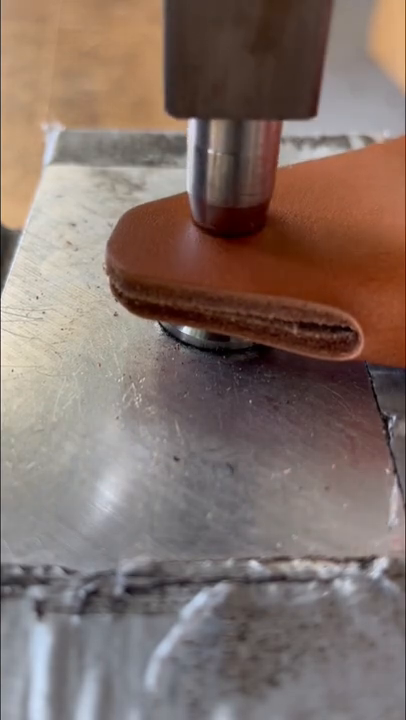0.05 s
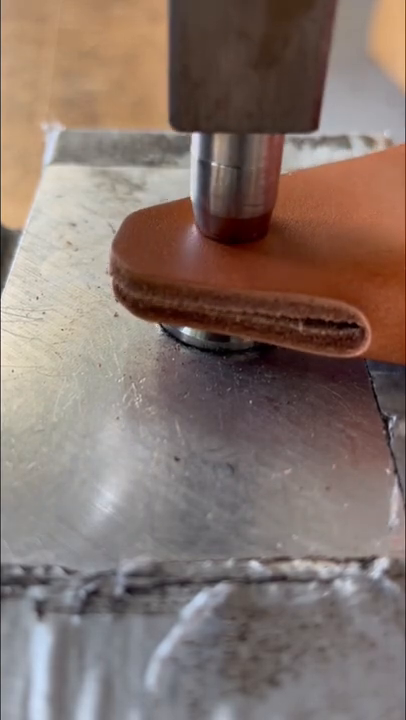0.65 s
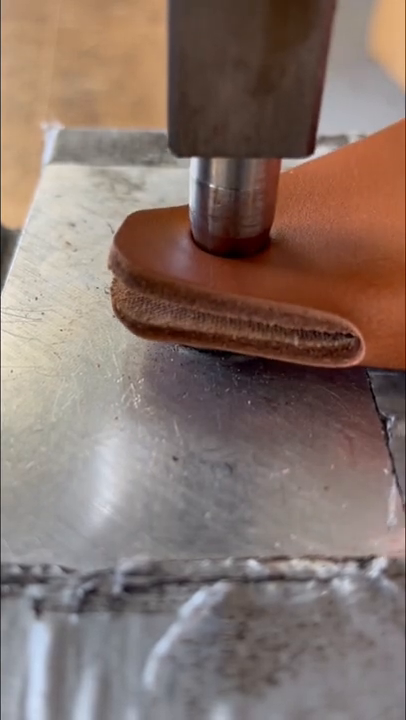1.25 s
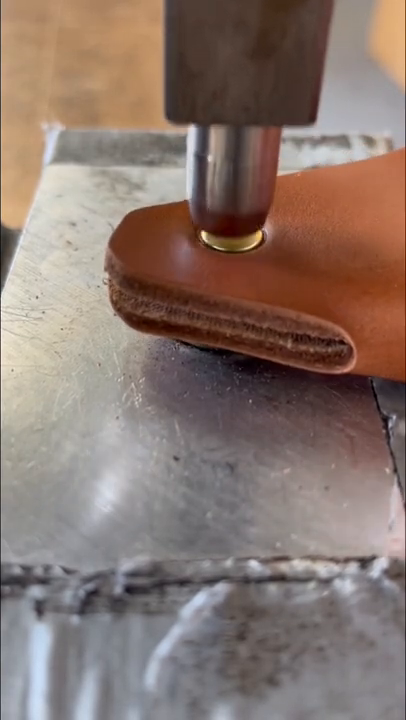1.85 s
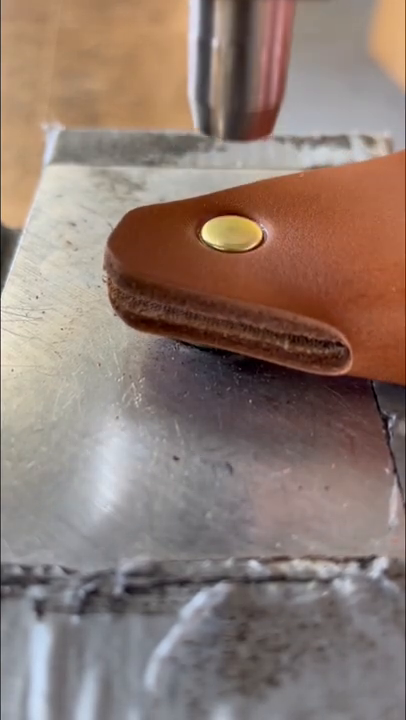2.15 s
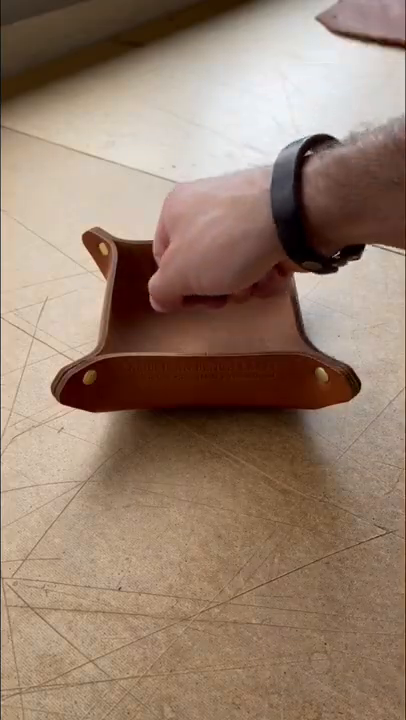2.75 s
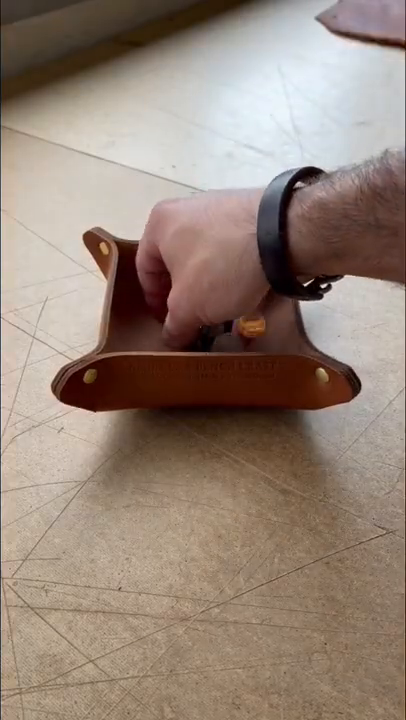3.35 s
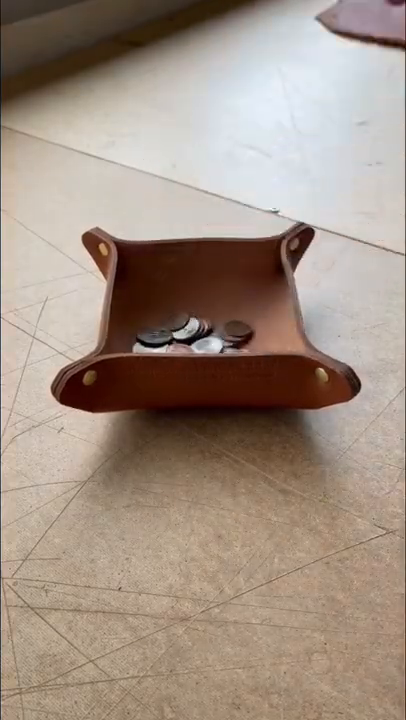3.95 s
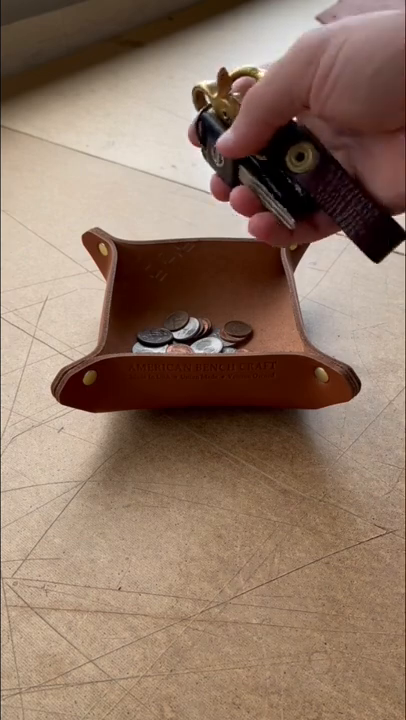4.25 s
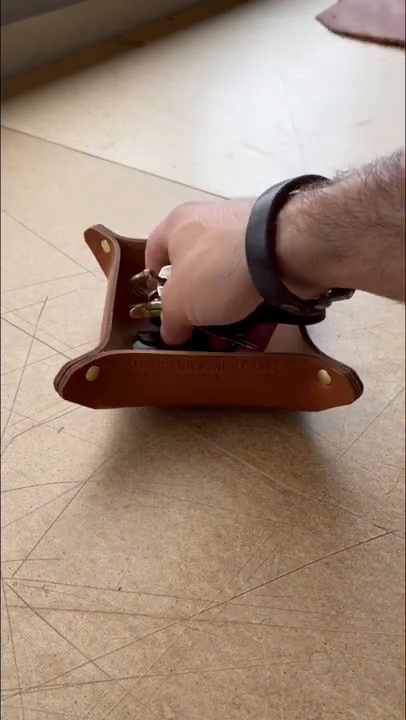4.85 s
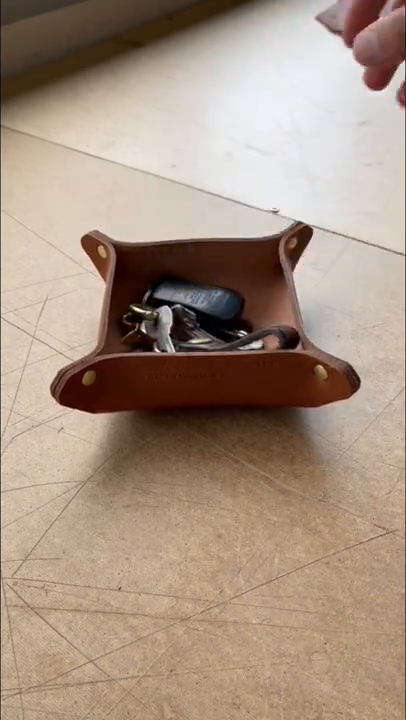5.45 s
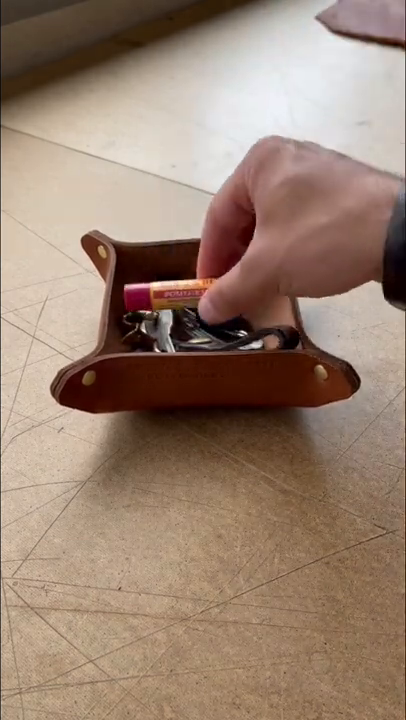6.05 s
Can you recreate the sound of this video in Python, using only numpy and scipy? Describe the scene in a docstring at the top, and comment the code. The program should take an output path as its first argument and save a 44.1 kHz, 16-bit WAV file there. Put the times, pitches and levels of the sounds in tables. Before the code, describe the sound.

Small metal clicks and a ringing clunk from a rivet press, followed by coins clinking and keys jangling into a leather tray.

```python
"""Over a mains hum, a hand press squeezes a rivet into leather: small contacts tick, the leather
rubs and creaks in stick-slip, and near 2 s the lever clunks back and rings the iron frame.
From 2.4 s, in a quieter room, coins shift in a fist and slide, clashing and ringing, into a
leather tray that slaps on its table. Near 5 s a bunch of keys jangles in after them.
A phone close by hears it all through two microphone ports."""
import sys
import numpy as np
from scipy import signal
from scipy.fft import rfft, irfft, next_fast_len
from scipy.io import wavfile
from scipy.ndimage import uniform_filter1d

SR = 44100
rng = np.random.default_rng(int(sys.argv[2]) if len(sys.argv) > 2 else 0)


def output_pcm(signal):
    """Save a mono or channel-first signal as 16-bit PCM at the path in sys.argv[1].

    Samples are clipped to [-1, 1] before scaling.
    """
    pcm = np.clip(np.atleast_2d(signal).T, -1, 1) * 32767
    wavfile.write(sys.argv[1], SR, np.round(pcm).astype(np.int16))


N = 274302
TIME = np.arange(N) / SR
ROOM_CHANGE_S = 2.39

# Levels in the tables are relative: each layer applies its own gain to them.
# Mains hum and faint whine in the workshop; faint whine in the quieter room.
# Each row: frequency in Hz, level in dB.
MAINS_HUM = [(59.2, -43.5), (118.4, -54), (177.6, -58), (360.7, -63), (683.7, -72.5)]
SHOP_WHINE = [(1319, -78.5), (1437, -79), (2579, -83.5), (2697, -95), (2821, -87), (3058, -84.5),
              (3898, -89), (4140, -87), (4258, -89), (4619, -88)]
ROOM_WHINE = [(1082, -81.5), (1443, -86), (2099, -88), (2342, -93), (2702, -92), (2939, -92), (3182, -91.5),
              (3300, -95.5)]
# Ventilation spectra of the two rooms. Each row: frequency in Hz, spectral level in dB.
SHOP_AIR = [(20, -19), (45, 1), (90, 4), (150, 1), (230, -9.5), (400, -17), (800, -22), (1400, -34.5),
            (1800, -33.5), (2800, -40.5), (5000, -43.5), (9000, -56.5), (14000, -51.5), (16000, -69)]
ROOM_AIR = [(20, -30.5), (55, -4.5), (120, -3.5), (175, 2.5), (260, -14.5), (400, -22.5), (700, -30),
            (1050, -31.5), (1600, -38.5), (2800, -45), (5000, -51.5), (8000, -61.5), (15000, -75)]

# Ticks of rivet, die and loose metal in the hand.
# Each row: start in seconds, level in dB, resonance in Hz, share of the snap in dB.
TICKS = [(.012, -40, 8100, -0.5), (.115, -50, 5140, -4.5), (.302, -42, 3620, -4.5), (.325, -44.5, 3800, -5),
         (.452, -55, 3000, -6), (.768, -44, 2900, -1), (.885, -46, 2230, -4.5), (.928, -42, 3280, -6.5),
         (.963, -35.5, 4100, -7.5), (0.987, -49, 2700, -3), (1.04, -51, 12000, 0), (1.059, -42, 12000, -2),
         (1.067, -41, 6900, 0), (1.073, -29.5, 2870, -2.5), (1.083, -39, 2980, -9), (1.092, -41, 2700, -13),
         (1.12, -47, 2800, -7), (1.159, -46, 2900, 4), (1.191, -42, 2280, -2), (1.197, -44.5, 2600, 1),
         (1.291, -42.5, 2010, -5.5), (1.32, -44, 12000, 0), (1.325, -37, 2500, -2.5),
         (1.415, -52, 2300, -2), (1.562, -50, 8400, 0.5), (1.789, -36, 2200, -10), (1.82, -31, 2760, 0.5),
         (1.855, -41.5, 4500, -2), (1.941, -37, 12500, 3.5), (1.947, -34, 3570, -8), (2.053, -37, 7500, -5),
         (2.061, -25, 2060, -14), (2.064, -26.5, 4730, -7), (2.087, -19, 4170, -12.5),
         (2.09, -32, 2050, -16), (2.187, -51, 4200, -15), (2.577, -48, 7940, 3),
         (2.607, -32.5, 12100, -4.5), (2.786, -51, 9500, -4), (2.89, -47.5, 11320, -2.5),
         (4.087, -46, 12140, -8.5), (4.118, -50.5, 8510, 0), (4.564, -55, 7510, 7.5),
         (4.603, -51.5, 8950, 0), (4.714, -57, 7940, 4)]
# Stretches of faint ticking. Each row: start and end in seconds, level in dB, resonance in Hz.
TICKING_SPANS = [(1.03, 1.123, -53, 2800), (2.8, 2.839, -53, 7500), (2.945, 2.974, -55, 8520),
                 (4.11, 4.16, -53, 7960)]
# Knocks of lever and ram; the hollow ring sinks as the ram lifts.
# Each row: start in seconds, levels of body, clank and ring in dB, ring frequency in Hz.
LEVER_KNOCKS = [(0.048, -44, -45.5, -62, 497), (1.072, -42.5, -42, -61, 500), (1.704, -37, -50, -39, 480),
                (1.787, -29, -23.5, -36, 507), (1.798, -25, -30.5, -21, 516), (1.822, -25.5, -29, -20, 495),
                (1.838, -37, -44, -25, 487), (1.945, -29.5, -23, -28, 504), (1.956, -33, -42, -25, 522),
                (2.053, -20, -20, -25, 447), (2.061, -20, -19, -23, 425), (2.071, -32, -33, -22, 467),
                (2.087, -20, -18, -12.5, 469.4), (2.094, -27.5, -37, -12, 472.5),
                (2.187, -35.5, -38, -25.5, 460)]
# Rubbing of leather, lever and die.
# Each row: start and length in seconds, level in dB, resonance and bandwidth in Hz.
RUBS = [(0.061, 0.081, -51.5, 565, 450), (0.105, 0.062, -46.5, 486, 111), (0.298, 0.13, -61.5, 4530, 2400),
        (0.686, 0.062, -57, 1090, 1100), (1.061, 0.057, -55.5, 1210, 1610), (1.282, 0.048, -63, 1300, 1500),
        (1.917, 0.033, -36, 610, 444), (2.028, 0.046, -30.5, 603, 450), (2.041, 0.028, -49, 11000, 7000),
        (2.09, 0.021, -47, 11000, 7000)]
# Soft bumps of bench and table. Each row: start in seconds, level in dB, frequency in Hz.
BUMPS = [(0.158, -27, 88.6), (0.193, -29, 88), (2.04, -33, 214), (2.115, -27, 70.4), (3.26, -32, 79),
         (3.455, -32, 73), (3.6, -31.5, 64), (5.075, -27.5, 62), (5.152, -30.5, 55), (5.268, -31, 49)]
# Creaks of the leather. Each row: start in seconds, level in dB, low share in dB, T60 in seconds.
CREAKS = [(0.321, -62.5, -15, 0.81), (0.691, -55.5, 9.5, 0.5), (1.063, -58, 8, 0.21),
          (1.29, -62.5, 4, 0.37)]
# Chimes of the steel die. Each row: start in seconds, level in dB.
DIE_CHIMES = [(1.158, -58), (1.942, -54), (2.054, -47), (2.095, -39)]

# Coins shift in the fist, then slide out in batches; keys dangle, touch the coins and drop.
# Each row: start and length in seconds, level of the rattle in dB, level on the tray in dB.
COIN_SLIDES = [(2.952, 0.051, -51.5, -81.5), (3.066, 0.082, -44, -72.5), (3.222, 0.038, -35, -32),
               (3.256, 0.036, -36, -29), (3.338, 0.013, -39.5, -51), (3.355, 0.022, -33, -34.5),
               (3.412, 0.16, -29, -30.5), (3.575, 0.089, -31.5, -34.5)]
KEY_SLIDES = [(4.835, 0.037, -58, -50), (4.905, 0.0093, -34, -40.5), (4.954, 0.076, -43, -43),
              (5.014, 0.11, -29.5, -47.5), (5.087, 0.064, -30, -37), (5.241, 0.021, -45.5, -40.5)]
RATTLE_COLUMN, TRAY_COLUMN = 2, 3
# The loudest coin clicks. Each row: start in seconds, level in dB.
COIN_CLICKS = [(2.953, -36.5), (2.974, -27.5), (3.047, -25.5), (3.076, -39), (3.104, -40), (3.218, -26),
               (3.26, -17.5), (3.306, -29.5), (3.358, -18.5), (3.406, -24), (3.416, -12.5), (3.432, -18.5),
               (3.477, -26), (3.524, -13.5), (3.542, -16.5), (3.586, -22), (3.839, -33.5)]
# Coins ringing freely. Each row: start in seconds, frequency in Hz, level in dB, seconds until damped.
COIN_RINGS = [(2.952, 12680, -47, 0.09), (3.025, 12240, -43, 0.076), (3.048, 15600, -43.5, .04),
              (3.076, 12400, -39.5, .07), (3.076, 12740, -38, 0.04), (3.357, 13160, -30.5, .012),
              (3.358, 15800, -28, .012), (3.413, 8330, -28.5, .008), (3.415, 11300, -31.5, .007),
              (3.426, 13040, -28.5, 0.012), (3.464, 12285, -33, 0.013), (3.467, 11905, -34.5, .012),
              (3.48, 13200, -27, .016), (3.482, 12400, -29.5, 0.037), (3.52, 7200, -32.5, 0.0068),
              (3.538, 12975, -26.5, .012), (3.539, 12680, -27.5, 0.009), (3.541, 9140, -29.5, .012),
              (3.58, 15300, -23, .05), (3.605, 12790, -29, 0.013), (3.63, 12800, -28, .015),
              (3.639, 13145, -32, .014), (3.651, 9100, -32, 0.019), (3.61, 9300, -33, .02),
              (3.652, 15400, -31, .025), (3.67, 9160, -43, 0.29), (3.685, 12690, -29, 0.073)]
# Blows on the tray's bottom.
# Each row: start in seconds, levels of thud, slap and hollow tock in dB, tock frequency in Hz.
TRAY_BLOWS = [(3.14, -21, -22, -15, 1310), (3.193, -29.5, -26.5, -22.5, 1300),
              (3.219, -36.5, -20.5, -15, 1270), (3.2203, -24.5, -11, -7, 1270),
              (3.2208, -37.5, -21, -7, 3900), (3.222, -32.5, -10.5, -3, 4760),
              (3.26, -19, -12.5, -18.5, 1150), (3.344, -47, -40, -43, 1080), (3.37, -38, -29.5, -21.5, 950),
              (3.407, -39.5, -28, -27, 1150), (3.416, -30.5, -23.5, -27, 1400),
              (3.431, -26.5, -30.5, -30, 1540), (3.452, -37, -36, -29, 960), (3.471, -43, -35, -24.5, 970),
              (3.488, -46, -29.5, -18.5, 1140), (3.515, -33, -31, -19, 1170),
              (3.525, -20.5, -28.5, -21, 4500), (3.544, -29.5, -29, -28, 750),
              (3.586, -33.5, -40, -26, 1140), (3.624, -38.5, -34, -30, 1100), (3.64, -44, -37.5, -29, 807),
              (3.674, -38, -39, -41.5, 1110), (3.721, -50, -57.5, -43, 850),
              (4.916, -42.5, -48, -27.5, 1020), (5.043, -38, -42.5, -29, 1090),
              (5.051, -30, -33, -31.5, 600), (5.092, -40, -34, -33.5, 980), (5.1194, -33.5, -18, -21, 1070),
              (5.255, -52, -37, -36, 850), (5.294, -52, -48, -36, 1010)]
# The loudest key clicks, each ringing one key.
# Each row: start in seconds, levels of click and ring in dB, ring frequency in Hz.
KEY_CLICKS = [(4.841, -43.5, -44.5, 7700), (4.868, -40, -51.5, 5050), (4.916, -23.5, -30, 8800),
              (4.924, -26.5, -42.5, 4350), (4.968, -31.5, -34, 7900), (4.984, -28, -45, 5060),
              (5.013, -30.5, -39, 4200), (5.023, -26, -34.5, 3180), (5.036, -26, -32, 8000),
              (5.044, -18, -28.5, 6940), (5.07, -30, -39.5, 2080), (5.082, -25, -28, 11280),
              (5.092, -17.5, -31, 3320), (5.098, -18.5, -28, 5170), (5.1195, -16, -27, 4470),
              (5.129, -19.5, -39, 2370), (5.138, -25, -21, 2920), (5.155, -19.5, -38, 2035),
              (5.169, -31, -39, 3560), (5.177, -33, -40, 1920), (5.184, -29.5, -44, 5070),
              (5.197, -29, -47, 7700), (5.256, -26.5, -50, 4460), (5.265, -29, -30, 8170),
              (5.276, -39, -40, 6930), (5.294, -31.5, -43, 4000)]

# Normal modes of the press frame, die, heaped coins, tray, table top and keys.
# Each row: frequency in Hz, level in dB, T60 (the time to decay by 60 dB) in seconds.
FRAME_MODES = [(84, -12.5, 0.51), (212.3, -3, 0.23), (279, -4, 0.12), (417, -4, 0.14), (586, -0.5, 0.13),
               (753, -5, 0.061), (926, -12, 0.075), (1016, -9.5, 0.12), (1182, -10, 0.078),
               (1435, -12, 0.077), (1990, -19, 0.05)]
DIE_MODES = [(3850, -8, .06), (4690, 0, .1), (6780, -2, .055), (8790, -5, .045), (11300, -4, .03),
             (12600, -8, .04), (12940, -7, .04), (15250, -2, .04)]
COIN_MODES = [(7050, -13, .03), (8090, -10, .04), (8480, -9, .04), (9120, -7, .06), (9300, -8, .06),
              (9480, -10, .05), (11450, -9, .04), (11850, -7, .04), (12290, -2, .07), (12520, -6, .04),
              (12760, -3, .06), (12950, -5, .04), (13100, -2, .06), (13400, -8, .04), (14000, -6, .07),
              (15100, 2, .05), (15250, 1, .04), (15420, 4, .05)]
TRAY_MODES = [(62, -11, 0.3), (134, -6, 0.096), (185, -8.5, 0.11), (334, 4, 0.069), (396, -0.5, 0.031),
              (585, -7.5, 0.1), (785, -14.5, 0.034), (1138, -13.5, 0.018)]
TABLE_MODES = [(2014, -6.5, 0.008), (3050, -11.5, 0.008), (3570, -8, 0.0036)]
KEY_MODES = [(2030, -15, .05), (2950, -17, .05), (4500, -13, .035), (5030, -10, .035), (7000, -7, .03),
             (7640, -10, .04), (8510, -9, .04), (9000, -5, .03), (11280, -7, .03), (12500, -3, .03),
             (13050, -2, .03), (13500, -5, .03), (14950, 5, .018), (15200, 7, .018), (15450, 8, .018)]
# Spectra of the contact noises. Each row: frequency in Hz, spectral level in dB.
TICK_SPECTRUM = [(300, -12), (1000, 1.5), (2500, 7.5), (5000, 2.5), (8500, -0.5), (13000, -5.5),
                 (15400, -1.5), (16400, 7.5)]
CLANK_SPECTRUM = [(200, -15), (600, 5), (880, 11), (1200, -3), (1700, -3), (2100, -2), (2800, -18),
                  (4400, -20.5), (7000, -28), (16000, -40)]
PRESS_BODY_SPECTRUM = [(40, -20), (100, -4), (300, -5.5), (480, -8.5), (900, -17), (1500, -20), (2200, -37),
                       (3200, -47), (5000, -39), (8000, -65), (16000, -49)]
COIN_SPECTRUM = [(300, -21), (1000, -9.5), (2700, -14), (4800, -2.5), (8000, 4), (13000, 4.5), (15500, 9),
                 (16000, -23)]
SLAP_SPECTRUM = [(150, -17.5), (600, -3.5), (1250, 3.5), (1600, -5.5), (2100, -3), (2800, -7.5),
                 (4500, -3.5), (8000, -1), (11000, -9), (15300, -4), (16200, -14.5)]
PATTER_SPECTRUM = [(25, -12), (60, 3), (180, 6), (350, 0), (520, -4.5), (800, -11), (1200, -13.5),
                   (2000, -20.5), (4000, -14.5), (10000, -34.5)]
KEY_SPECTRUM = [(300, -3), (1000, 7.5), (1500, -4), (2100, -2.5), (2700, 0), (4000, -0.5), (5200, 3),
                (8000, 5), (13000, 0), (15400, 3.5), (16100, -20)]

# Response of the two microphone ports.
# Each row: frequency in Hz, phase lead of the left in radians, left minus right level in dB.
PORT_RESPONSE = [(0, 0, 0), (500, -.7, 2.5), (1000, -.7, .5), (1700, -.2, 0), (2300, 1, 0), (2750, 2.4, -1),
                 (3600, .9, -1), (5100, 1.3, 0), (6000, 3.14, 0), (7900, 6.2, 0), (8700, 6.9, 0),
                 (10200, 9.42, 0), (12200, 12.4, 0), (13300, 13.1, 0), (14600, 15.7, 0), (16500, 16.5, 0)]
# Brief dips of the level. Each entry: centre in seconds.
LEVEL_DIPS = [2.39, 4.027, 5.691]


def undb(db):
    """Amplitude ratio of a level in decibels."""
    return 10 ** (np.asarray(db) / 20)


def unit(x):
    """Normalisation to an rms of 1."""
    return x / np.sqrt(np.mean(x ** 2))


def add(track, s, sound):
    """Superposition of a sound on a track at s seconds."""
    start = int(s * SR)
    track[start:start + len(sound)] += sound[:N - start]


def colour(x, points):
    """Minimum-phase filtering, with unit energy, through (Hz, dB) points."""
    hz, db = np.transpose(points)
    grid = np.maximum(np.fft.rfftfreq(4096, 1 / SR), 1)
    cepstrum = irfft(np.log(undb(np.interp(np.log(grid), np.log(hz), db))))
    half = len(cepstrum) // 2
    cepstrum[1:half] *= 2  # folding the cepstrum makes the filter causal
    cepstrum[half + 1:] = 0
    response = irfft(np.exp(rfft(cepstrum)))[:half]
    return signal.oaconvolve(x, response / np.linalg.norm(response))[:N]


def fade(t60):
    """Exponential decay through 60 dB."""
    return np.exp(-np.log(1000) * np.arange(int(t60 * SR) + 2) / (t60 * SR))


def swell(t60, rise_s):
    """Exponential decay with a finite rise time."""
    shape = fade(t60)
    return shape * (1 - np.exp(-TIME[1:len(shape) + 1] / rise_s))


def bursts(rows, rise_s=.0002):
    """Contact noise: each row (s, dB, T60) is a dying flurry of tiny collisions."""
    out = np.zeros(N)
    for s, db, t60 in rows:
        shape = swell(min(t60, 1), rise_s)
        add(out, s, undb(db) * shape * rng.standard_normal(SR + 2)[:len(shape)])
    return out


def pings(rows, rise_s=.0001):
    """Damped oscillation: each row (s, dB, Hz, T60) is one struck resonance."""
    out = np.zeros(N)
    for s, db, hz, t60 in rows:
        shape = swell(t60, rise_s)
        add(out, s, undb(db) * shape * np.sin(2 * np.pi * hz * TIME[:len(shape)]))
    return out


def strikes(rows, modes, scatter_db, detune):
    """Modal superposition: blows (s, dB) ring the modes a little differently at each contact point."""
    out = np.zeros(N)
    chance = rng.standard_normal((len(rows), len(modes), 2))
    for (s, db), draws in zip(rows, chance):
        for k, ((hz, mode_db, t60), (strength, shift)) in enumerate(zip(modes, draws)):
            shape = fade(t60)
            wave = np.sin(2 * np.pi * hz * (1 + detune * shift) * TIME[:len(shape)])
            add(out, s, (-1) ** k * undb(db + mode_db + scatter_db * strength) * shape * wave)
    return out


def grains(per_s, spread_db):
    """A Poisson process of tiny, uneven impacts, with steady power near 1."""
    hit = rng.random(N) < per_s / SR
    impacts = hit * rng.choice([-1, 1], N) * undb(spread_db * rng.exponential(size=N))
    return impacts / np.sqrt(np.abs(uniform_filter1d(impacts ** 2, size=1100)) + 1e-6)


def tones(lines):
    """A line spectrum: steady sines of random phase from (Hz, dB rms) rows."""
    return sum(np.sqrt(2) * undb(db) * np.sin(2 * np.pi * (hz * TIME + rng.random()))
               for hz, db in lines)


def ventilation(spectrum, db, apart_hz=1300):
    """Diffuse rumble is coherent at the two ports in the bass and incoherent in the treble."""
    mid, side = (unit(colour(rng.standard_normal(N), spectrum)) for _ in range(2))
    side = signal.lfilter(*signal.butter(1, apart_hz, "high", fs=SR), side)
    return undb(db) * (mid + side * np.array([[1], [-1]]))


def background():
    """Stationary tones and noise: the humming workshop, then the quieter room."""
    shop = tones(MAINS_HUM) + undb(1) * tones(SHOP_WHINE) + ventilation(SHOP_AIR, db=-46)
    quiet = undb(5) * tones(ROOM_WHINE) + ventilation(ROOM_AIR, db=-46.5)
    return np.where(TIME < ROOM_CHANGE_S, shop, quiet)


def faint_ticks(per_s=22, scatter_db=2):
    """Random scatter of time, level and pitch gives rows like TICKS over each span of ticking."""
    rows = []
    for start, end, db, hz in TICKING_SPANS:
        count = max(round((end - start) * per_s), 1)
        for k, (when, size, pitch) in enumerate(rng.random((count, 3))):
            s = start + (end - start) * (k + when) / count
            rows.append((s, db + scatter_db * (2 * size - 1), hz * 2 ** (pitch - .5), 0))
    return rows


def heavy_slips(below_hz=5000):
    """Heavier parts ring lower: the ticks (s, dB) at the press that can move die and leather."""
    return [(s, db) for s, db, hz, _ in TICKS if s < ROOM_CHANGE_S and hz < below_hz]


def ticks(t60=.0098, die_db=-7, die_hz=780, die_t60=.025):
    """Brief contacts excite a snap and a broad resonance; smaller parts radiate less bass."""
    rings, snaps = np.zeros(N), np.zeros(N)
    shape = fade(t60)
    for s, db, hz, snap_db in list(TICKS) + faint_ticks():
        noise = unit(shape * rng.standard_normal(SR)[:len(shape)])
        contact = np.pad(noise * undb(db) * np.sqrt(np.mean(shape ** 2)), (0, len(shape)))
        snap = signal.lfilter(*signal.butter(2, hz / 3, "high", fs=SR), contact)
        ring = signal.lfilter(*signal.iirpeak(hz, Q=5, fs=SR), contact)
        add(snaps, s, undb(snap_db) * snap)
        add(rings, s, ring * np.linalg.norm(contact) / np.linalg.norm(ring))
    die = pings([(s, db + die_db, die_hz, die_t60) for s, db in heavy_slips()])
    return undb(-8) * rings + colour(snaps, TICK_SPECTRUM) + die


def frame_modes(softer_db, dull_above_hz=620):
    """A softer impact excites the frame's upper modes less, so it rings duller."""
    db_per_octave = .5 * softer_db
    return [(hz, db - db_per_octave * max(np.log2(hz / dull_above_hz), 0), t60)
            for hz, db, t60 in FRAME_MODES]


def lever(full_force_db=-18.5, rebound_s=.009, crack_t60=.042, clank_t60=.024, body_t60=.065,
          hollow_t60=.078):
    """Impact and rebound: the lever knocks twice in its play, and the iron frame rings hollow."""
    knocks = [row[:3] for row in LEVER_KNOCKS]
    knocks += [(s + rebound_s, db - 10, clank_db - 7) for s, db, clank_db in knocks]
    # only hard knocks crack: the crack loses 4 dB for each dB below full force
    cracks = bursts([(s, -46 + 4 * (db - full_force_db), crack_t60) for s, db, _ in knocks])
    clanks = bursts([(s, db, clank_t60) for s, _, db in knocks], rise_s=.00051)
    body = bursts([(s, db - 4, body_t60) for s, db, _ in knocks], rise_s=.0011)
    frame = sum(strikes([(s, db - 6)], frame_modes(full_force_db - db), scatter_db=1.5, detune=.008)
                for s, db, _ in knocks)
    hollow = pings([(s, db, hz, hollow_t60) for s, _, _, db, hz in LEVER_KNOCKS], rise_s=.0015)
    return (colour(cracks, TICK_SPECTRUM) + colour(clanks, CLANK_SPECTRUM)
            + colour(body, PRESS_BODY_SPECTRUM) + frame + hollow)


def rubs():
    """Stick-slip friction drives one resonance in each rub, swelling and fading."""
    out = np.zeros(N)
    slips = grains(per_s=900, spread_db=2)
    for s, length, db, hz, width in RUBS:
        arch = np.sqrt(np.hanning(int(length * SR)))
        band_hz = [max(hz - width / 2, hz / 2), hz + width / 2]
        resonance = signal.butter(2, band_hz, "band", fs=SR, output="sos")
        rub = signal.sosfilt(resonance, slips[int(s * SR):][:len(arch)])
        add(out, s, undb(db) * arch * unit(rub))
    return out


def bumps(t60=.16):
    """A hand's weight excites a low resonance of the work surface."""
    return pings([(s, db, hz, t60) for s, db, hz in BUMPS])


def crackle(t60=.059, band_hz=(1300, 4500)):
    """Stress relaxation: after each heavy slip the leather's fibres give way in a fine crackle."""
    give = np.zeros(N)
    for s, db in heavy_slips():
        add(give, s, undb(db - 13) * fade(t60))
    fibres = give * grains(per_s=600, spread_db=2.5)
    return signal.sosfilt(signal.butter(2, band_hz, "band", fs=SR, output="sos"), fibres)


def creaks():
    """Friction in the leather under the die makes a bright creak over a low groan."""
    creak = bursts([(s, db, t60) for s, db, _, t60 in CREAKS])
    groan = bursts([(s, db + low_db, t60) for s, db, low_db, t60 in CREAKS])
    groan = colour(groan, [(200, 4.5), (700, 3.5), (1300, 2.5), (2200, -28), (6000, -36)])
    return colour(creak, TICK_SPECTRUM) + groan


def die_chimes():
    """Free vibration of the steel die as it shifts and springs clear of the rivet."""
    return strikes(DIE_CHIMES, DIE_MODES, scatter_db=2, detune=.003)


def sliding(slides, column, attack_s=.011, sag_db_per_s=10, stop_t60=.17, settle_db=-25, settle_t60=.66):
    """Incoherent slides add in power; each starts, sags and stops, and a few pieces go on settling."""
    power = np.zeros(N)
    for row in slides:
        age, length = TIME - row[0], row[1]
        hold = np.clip(age / attack_s, 0, 1) * undb(row[column] - sag_db_per_s * np.clip(age, 0, length))
        fall = np.log(1000) * np.maximum(age - length, 0)
        release = np.maximum(np.exp(-fall / stop_t60), undb(settle_db) * np.exp(-fall / settle_t60))
        power += (hold * release) ** 2
    return np.sqrt(power)


def jingle(contacts, modes, turn_s=.015):
    """Forced resonance: contacts drive the modes of metal pieces, which take turns as they tumble."""
    out = np.zeros(N)
    turns = np.arange(0, N / SR + .1, turn_s)
    for hz, db, t60 in modes:
        radius = np.exp(-np.log(1000) / (t60 * SR))
        angle = 2 * np.pi * hz / SR
        poles = [1, -2 * radius * np.cos(angle), radius ** 2]
        gain = np.sin(angle) * np.sqrt(2 * (1 - radius ** 2))
        share = unit(np.interp(TIME, turns, rng.random(len(turns)) ** 2))
        out += undb(db) * signal.lfilter([gain], poles, contacts * share * rng.standard_normal(N))
    return out / np.linalg.norm(undb(np.array(modes)[:, 1]))


def clacks(slides, column, per_s, low_hz, high_hz, t60):
    """Separate collisions of sliding pieces, each a damped oscillation with its own pitch."""
    out = np.zeros(N)
    shape = fade(t60)
    start, end = round(slides[0][0], 1) - .1, round(slides[-1][0], 1) + .3
    for k, (when, pitch, size) in enumerate(rng.random((int((end - start) * per_s), 3))):
        hz = low_hz * (high_hz / low_hz) ** pitch
        ring = shape * np.sin(2 * np.pi * hz * TIME[:len(shape)])
        add(out, start + (k + when) / per_s, size ** 2 * ring)
    return unit(out) * np.sqrt((end - start) * SR / N) * sliding(slides, column)


def coins(click_t60=.012):
    """Dense collisions excite the coins' modes, which contact with the heap soon damps."""
    rattle = grains(per_s=650, spread_db=1.8) * sliding(COIN_SLIDES, RATTLE_COLUMN)
    contacts = rattle + bursts([(s, db, click_t60) for s, db in COIN_CLICKS])
    clash = colour(contacts, COIN_SPECTRUM)
    ring = jingle(contacts, COIN_MODES)
    knocks = clacks(COIN_SLIDES, RATTLE_COLUMN, per_s=260, low_hz=7000, high_hz=14000, t60=.045)
    return undb(-2.5) * clash + undb(-2) * ring + undb(-7) * knocks


def free_coins(t60=.43, damping_s=.0059, jostle_s=.008, jostle_db=3):
    """Mode splitting: a coin is never quite round, so it rings as a beating pair until damped."""
    out = np.zeros(N)
    shape = swell(t60, rise_s=.0023)
    t = TIME[:len(shape)]
    turns = np.arange(0, 1, jostle_s)
    for s, hz, db, free_s in COIN_RINGS:
        damping = np.exp(-np.maximum(t - free_s, 0) / damping_s)
        beat_hz = rng.uniform(25, 80)
        pair = np.sin(2 * np.pi * hz * t) + .4 * np.sin(2 * np.pi * (hz + beat_hz) * t)
        # the coin tilts as it is jostled, so its ring wavers
        waver = undb(np.interp(t, turns, jostle_db * rng.standard_normal(len(turns))))
        add(out, s, undb(db) * shape * damping * pair * waver)
    return out


def slaps(t60=.0036, soft_hz=2820, hard_hz=19000, scuff_db=-20, scuff_t60=.09):
    """A harder impact has a wider spectrum: the leather gives, slaps on the table, then scuffs."""
    out = np.zeros(N)
    shape, tail = swell(t60, rise_s=.00042), fade(scuff_t60)
    for s, _, db, _, _ in TRAY_BLOWS:
        cutoff_hz = soft_hz + (hard_hz - soft_hz) * undb(db)
        grit = signal.lfilter(*signal.butter(4, cutoff_hz, fs=SR), rng.standard_normal(SR))
        slap = shape * grit[:len(shape)]
        add(out, s, undb(db) * slap * np.linalg.norm(fade(t60)) / np.linalg.norm(slap))
        add(out, s, undb(db + scuff_db) * tail * unit(grit)[-len(tail):])
    return undb(2) * colour(out, SLAP_SPECTRUM)


def tray(tock_cycles=14):
    """Blows excite the modes of tray and table, and sliding metal patters on the leather."""
    tocks = pings([(s, db, hz, tock_cycles / hz) for s, _, _, db, hz in TRAY_BLOWS])
    thuds = strikes([(s, db - 2) for s, db, *_ in TRAY_BLOWS], TRAY_MODES, scatter_db=1.5, detune=.03)
    flow = sliding(COIN_SLIDES, TRAY_COLUMN) + sliding(KEY_SLIDES, TRAY_COLUMN)
    patter = colour(grains(per_s=350, spread_db=2.3) * flow, PATTER_SPECTRUM)
    taps = sum(clacks(slides, TRAY_COLUMN, per_s=170, low_hz=750, high_hz=1800, t60=.012)
               for slides in (COIN_SLIDES, KEY_SLIDES))
    # the hard table top snaps through the leather under each slap
    snaps = strikes([(s, db) for s, _, db, _, _ in TRAY_BLOWS], TABLE_MODES, scatter_db=1.5, detune=.03)
    return snaps + tocks + thuds + undb(-3) * patter + undb(-12) * taps


def keys(click_t60=.014, clink_t60=.02):
    """Keys scrape and collide with the coins, exciting heavily damped modes of many pitches."""
    rattle = grains(per_s=1100, spread_db=1.5) * sliding(KEY_SLIDES, RATTLE_COLUMN)
    contacts = rattle + bursts([(s, db, click_t60) for s, db, _, _ in KEY_CLICKS])
    clinks = pings([(s, db, hz, clink_t60) for s, _, db, hz in KEY_CLICKS])
    jangle = clacks(KEY_SLIDES, RATTLE_COLUMN, per_s=800, low_hz=6500, high_hz=15600, t60=.025)
    blades = clacks(KEY_SLIDES, RATTLE_COLUMN, per_s=220, low_hz=1700, high_hz=5400, t60=.022)
    clash = colour(contacts, KEY_SPECTRUM)
    ring = jingle(contacts, KEY_MODES)
    return undb(-6) * (clash + jangle) + undb(-2.5) * ring + clinks + undb(-17) * blades


def ports(x):
    """Diffraction round the phone makes phase and level between its ports vary with frequency."""
    size = next_fast_len(N + SR // 2)
    freq = np.fft.rfftfreq(size, 1 / SR)
    hz, lead, pan_db = np.transpose(PORT_RESPONSE)
    left = np.exp(.5j * np.interp(freq, hz, lead)) * undb(np.interp(freq, hz, pan_db) / 2)
    spectrum = rfft(x, size)
    return np.array([irfft(spectrum * side, size)[:N] for side in (left, 1 / left)])


def convolve_ports(x, responses):
    """Convolution with one impulse response per port, each scaled to unit energy."""
    return np.array([signal.oaconvolve(x, h / np.linalg.norm(h))[:N] for h in responses])


def reflections(x, t60=.024, wet_db=-11):
    """Early reflections: table, hand and tray walls scatter short waves differently to each port."""
    shape = fade(t60)
    echoes = shape * rng.standard_normal((2, SR))[:, :len(shape)]
    short_waves = signal.lfilter(*signal.butter(1, [550, 14000], "band", fs=SR), x)
    return undb(wet_db) * convolve_ports(short_waves, echoes)


def room(x, t60=.27, wet_db=-18, build_s=.0094):
    """Reverberation: a short, dull, diffuse tail, uncorrelated at the two ports."""
    shape = fade(t60)
    shape *= np.minimum(TIME[:len(shape)] / build_s, 1)
    tails = shape * rng.standard_normal((2, 2 * SR))[:, :len(shape)]
    dull = colour(x, [(60, 2), (400, 8), (2000, 6.5), (8000, 1), (16000, -21)])
    return undb(wet_db) * convolve_ports(dull, tails)


def scene(press_left_db=1):
    """Superposition of the press a little to the left, the tray in the middle, room and background."""
    press = ticks() + crackle() + rubs() + lever() + creaks() + die_chimes()
    sources = [(press, press_left_db), (bumps() + slaps() + tray(), 0),
               (coins() + free_coins(), 0), (keys(), 0)]
    near = sum((ports(x) + reflections(x)) * undb(np.array([[db], [-db]]) / 2) for x, db in sources)
    return near + room(sum(x for x, _ in sources)) + background()


def record(dry, dip_half_width_s=.038, low_hz=38, top_hz=16500, ceiling=.85):
    """The level dips briefly three times; the phone limits the bandwidth and saturates softly."""
    for s in LEVEL_DIPS:
        dry = dry * np.clip(np.abs(TIME - s) / dip_half_width_s, .05, 1)
    dry = signal.sosfilt(signal.butter(4, low_hz, "high", fs=SR, output="sos"), dry)
    rounded = ceiling * np.tanh(dry / ceiling)
    return signal.sosfilt(signal.ellip(10, .2, 70, top_hz, fs=SR, output="sos"), rounded)


dry = scene()
out = record(dry)
output_pcm(out)
```